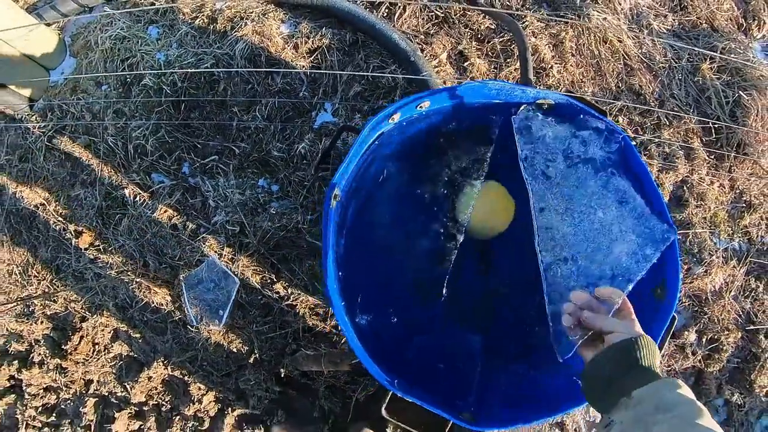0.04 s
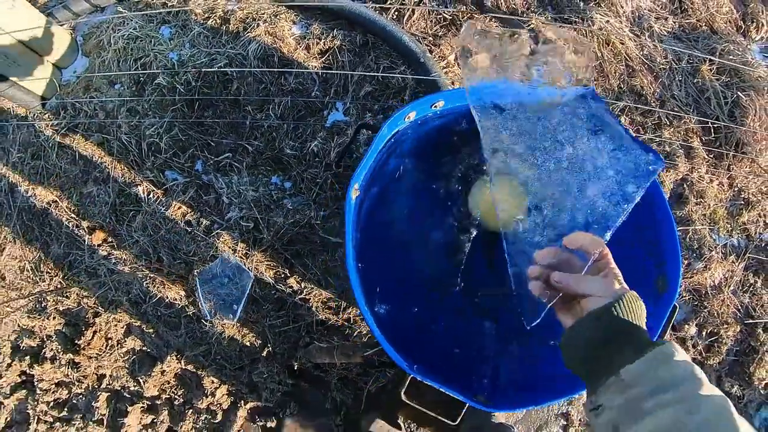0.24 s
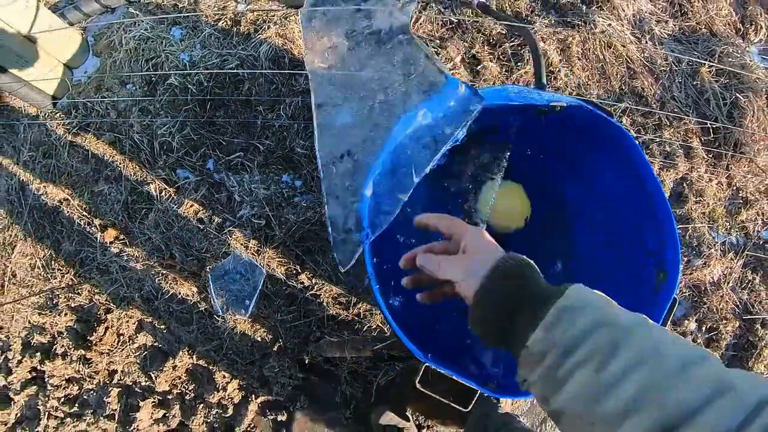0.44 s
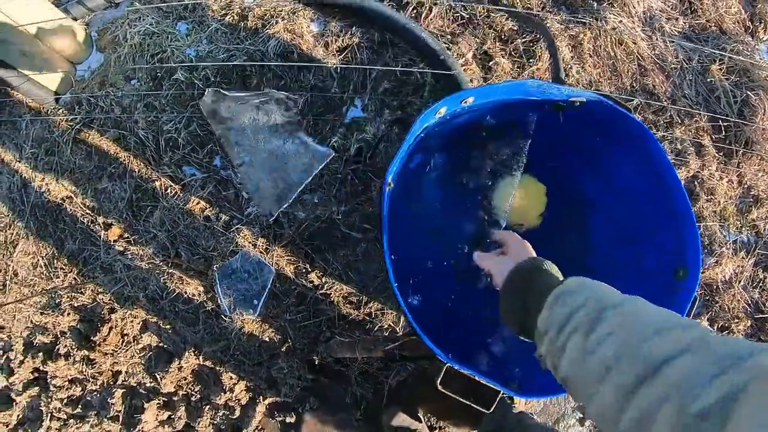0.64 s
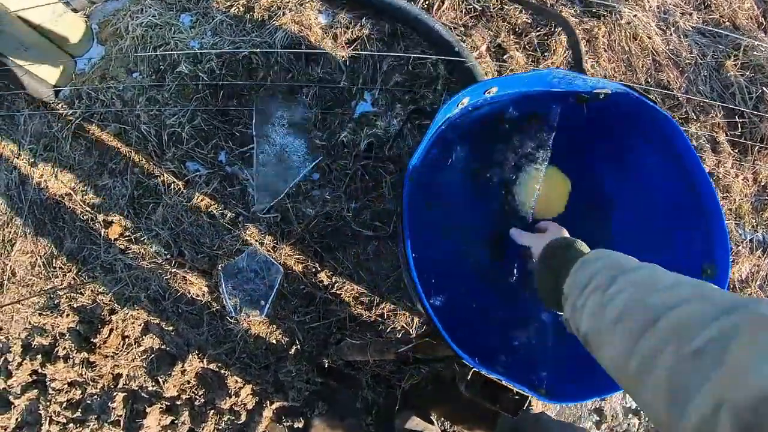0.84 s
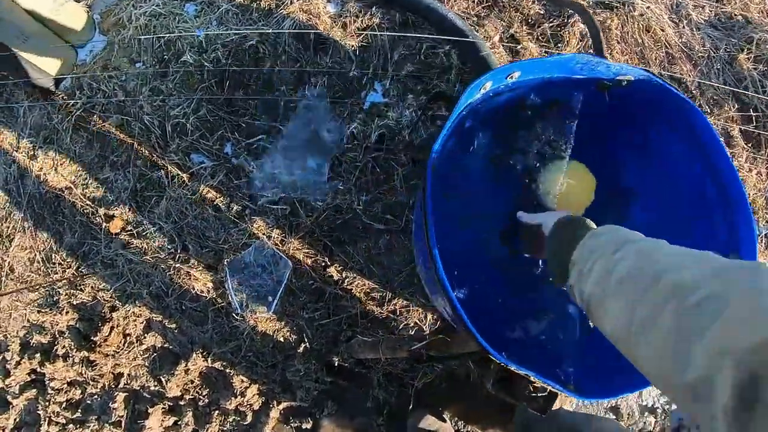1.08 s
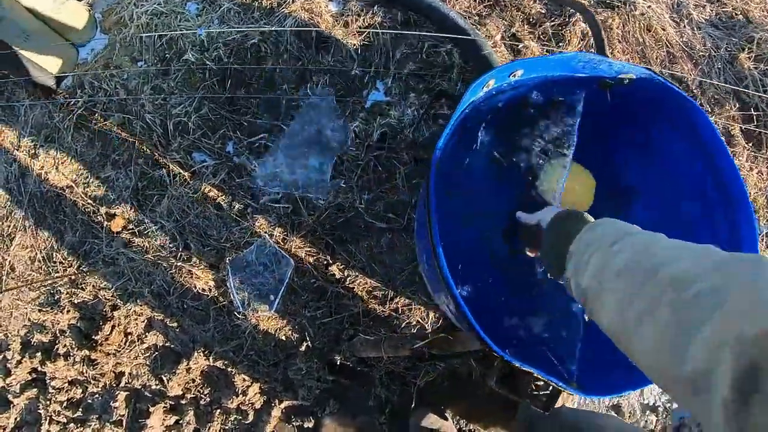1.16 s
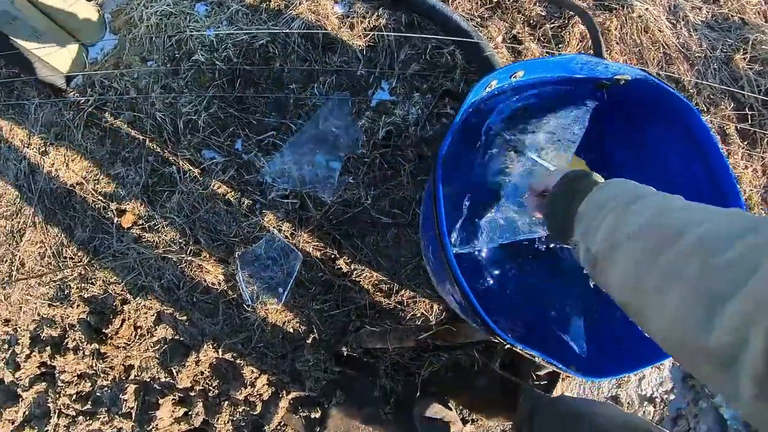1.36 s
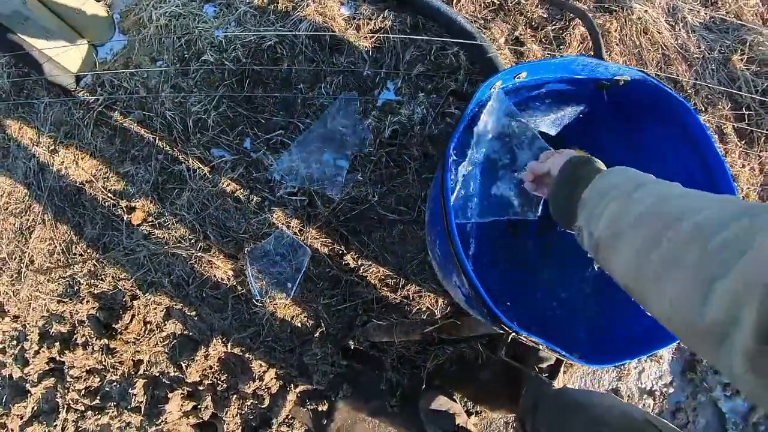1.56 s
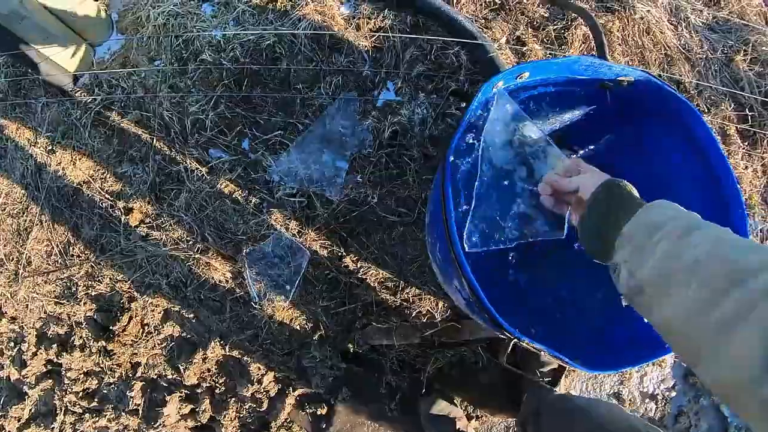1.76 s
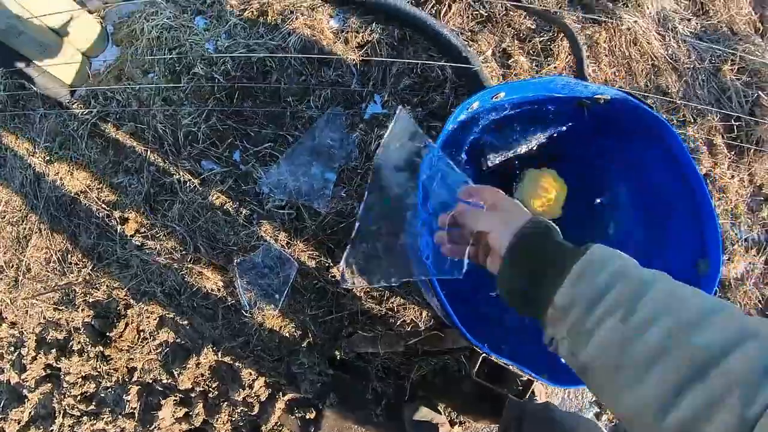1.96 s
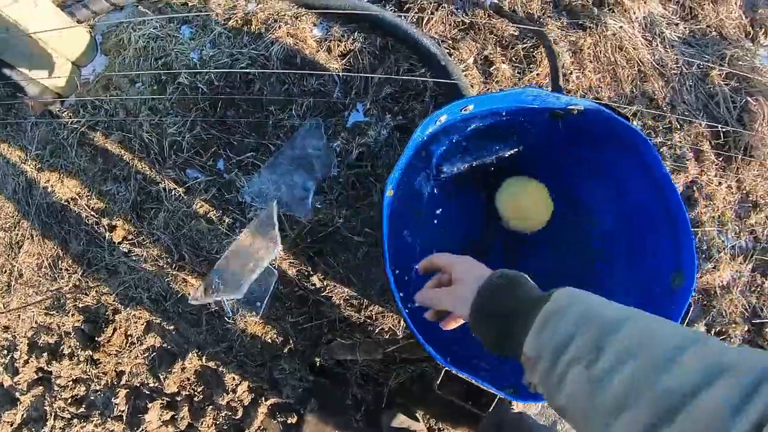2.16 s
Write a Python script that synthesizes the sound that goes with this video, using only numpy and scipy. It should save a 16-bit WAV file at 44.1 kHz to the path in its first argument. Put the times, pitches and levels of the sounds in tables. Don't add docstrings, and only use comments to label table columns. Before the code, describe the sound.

Thin sheet ice cracking and snapping by hand in a plastic tub, with small water slops

```python
import sys
import numpy as np
from scipy import signal
from scipy.fft import rfft, irfft, next_fast_len
from scipy.io import wavfile
from scipy.ndimage import uniform_filter1d

SR = 44100
rng = np.random.default_rng(int(sys.argv[2]) if len(sys.argv) > 2 else 0)


def invert_db(x):
    u = np.asarray(x, float) / 20
    return 10 ** u


def int16_out(signal):
    q = np.round(np.clip(np.atleast_2d(signal).T, -1, 1) * 32767)
    wavfile.write(sys.argv[1], SR, q.astype(np.int16))


N = 98122


def in_time(rows):
    return np.interp(np.arange(N) / SR, *np.transpose(rows))


def rms_one(x):
    return x / np.sqrt(np.mean(x ** 2) + 1e-20)


def peak_one(x):
    return x / np.abs(x).max()


def low_pass(x, hz, order=4):
    return signal.sosfilt(signal.butter(order, hz, fs=SR, output="sos"), x)


def high_pass(x, hz, order=4):
    return signal.sosfilt(signal.butter(order, hz, "high", fs=SR, output="sos"), x)


def colour(x, points):
    size = next_fast_len(2 * len(x) + 4096)
    hz, db = np.transpose(points)
    bins_hz = np.arange(size // 2 + 1) * SR / size
    log_gain = np.interp(np.log(bins_hz + 1), np.log(hz), db) * np.log(10) / 20
    cepstrum = irfft(log_gain, size)
    cepstrum[1:size // 2] *= 2
    cepstrum[size // 2 + 1:] = 0
    return irfft(rfft(x, size) * np.exp(rfft(cepstrum)), size)[:len(x)]


def resonance(x, hz, width):
    r = np.exp(-np.pi * width / SR)
    top = np.array([1, 0, -1]) * (1 - r * r) / 2
    return signal.lfilter(top, [1, -2 * r * np.cos(2 * np.pi * hz / SR), r * r], x)


def drift(rate):
    r = np.exp(-2 * np.pi * rate / SR)
    noise = rng.standard_normal(N + SR)
    return rms_one(signal.lfilter([1], [1, -2 * r, r * r], noise)[SR:])


def add(out, s, x):
    i = int(s * SR)
    out[i:i + len(x)] += x[:N - i]


def crack_growth(t, run):
    grow = invert_db(258.5 * np.minimum(t - run, 0))
    return grow * np.minimum(t / (run * run * 10), 1)


# (frequency [Hz], density [dB per Hz])
AIR_COLOUR = [(25, 12.5), (85, 5), (240, -2.5), (600, -36.5), (1000, -35.5), (7000, -23), (8500, -37.5),
              (16500, -65.5)]


def air():
    return invert_db(-64.5) * rms_one(colour(rng.standard_normal(N), AIR_COLOUR))


# (time [s], level [dB])
SLOP = [(0, -51), (.2, -70.5), (.36, -65), (.55, -69), (.87, -71.5), (.97, -58), (1.05, -61.5), (1.12, -39),
        (1.26, -53), (1.45, -35.5), (1.6, -44.5), (1.72, -38), (1.87, -40.5), (2.02, -57.5), (2.23, -70)]
# (frequency [Hz], density [dB per Hz])
SLOP_COLOUR = [(60, -38.5), (240, 4.5), (900, -13), (1800, -21), (3200, -27), (6800, -33), (8300, -66.5),
               (16000, -76.5)]


def slop():
    grains_per_s, grain_db, kinds = 900, -9, 20
    struck = rng.random(N) < grains_per_s / SR
    sizes = invert_db(5.5 * np.minimum(rng.exponential(1, N), 2)) * struck + 1e-18
    dealt = rng.integers(0, kinds, N)
    grains = np.zeros(N)
    for k, hz in enumerate(np.geomspace(500, 7000, kinds)):
        grains += resonance(sizes * (dealt == k), hz, hz / 20)
    wash = rms_one(rng.standard_normal(N) * invert_db(2 * drift(21)))
    mix = wash + invert_db(grain_db) * rms_one(grains)
    return invert_db(in_time(SLOP)) * rms_one(colour(mix, SLOP_COLOUR))


# (time [s], peak level [dB], plate ring [Hz], crack run [s], tub thump level [dB])
FIRST = [(.0005, -28.5, 2300, 0.0038, -53), (.010, -31, 2240, 0.0085, -65), (.018, -27, 3530, 0.0099, -74),
         (.048, -38.5, 2460, 0.0022, -46.5), (.6685, -42.5, 3230, 0.0079, -71),
         (.6885, -9.5, 2930, 0.00028, -25.5), (.704, -23, 3500, 0.018, -78),
         (.720, -15.5, 3780, 0.019, -28), (.7345, -12, 3530, 0.0026, -51),
         (.7498, -12.5, 4630, 0.0026, -30.5), (.883, -38, 3440, 0.019, -53),
         (.899, -29.5, 4095, 0.024, -43), (.9178, -6, 3210, 0.013, -61.5), (.9275, -7, 4276, 0.0044, -15),
         (.966, -51.5, 3400, 0.0042, -36), (1.059, -44.5, 2940, 0.0066, -76),
         (1.075, -15.5, 3800, 0.012, -27), (1.0835, -14.5, 2480, 0.003, -23.5),
         (1.107, -24, 2660, 0.0017, -28.5), (1.1375, -21, 2596, 0.0053, -33.5),
         (1.268, -37, 4500, 0.016, -69), (1.2885, -10.5, 4240, 0.0066, -24.5),
         (1.297, -21, 3010, 0.011, -21)]
SECOND = [(1.363, -22.5, 5530, 0.029, -45), (1.3824, -22.5, 4900, 0.0076, -61),
          (1.3991, -1.5, 5230, 0.0024, -16), (1.416, -24.5, 5700, 0.023, -30.5),
          (1.4575, -16, 6560, 0.0062, -21), (1.469, -29.5, 2880, .025, -20.5),
          (1.5052, -17, 5770, 0.0022, -31), (1.5312, -24, 4040, 0.0034, -55),
          (1.558, -19.5, 3190, 0.0016, -22), (1.567, -25, 2300, 0.0065, -61),
          (1.585, -23.5, 5430, 0.0013, -44), (1.628, -25, 3460, 0.0034, -70),
          (1.633, -22, 2500, 0.0054, -28), (1.648, -23, 4730, 0.006, -52),
          (1.663, -27.5, 2740, 0.0088, -26), (1.683, -24, 2230, 0.017, -23),
          (1.708, -6, 2490, 0.00028, -13), (1.717, -12, 5100, 0.0018, -54),
          (1.735, -35, 3080, 0.012, -26.5), (1.7940, -15.5, 5350, 0.0011, -16.5),
          (1.731, -28.5, 4800, 0.0065, -57)]
# (frequency [Hz], gain [dB])
FRACTURE_COLOUR = [(130, -45), (400, -12.5), (1160, -5.5), (2200, -3.5), (3300, -7.5), (6800, -9.5), (8300, -23.5),
                   (12000, -35.5), (16500, -58)]
ICE_HZ = np.array([818.0, 1148.0, 1600, 2920, 3470, 4240, 4903, 5650])


def fractures():
    ring_width, mode_width = .38, .035
    broad_db, mode_db = 2.5, -6
    crack_t60, tail_t60, snap_t60 = .017, .1, .0027
    tail_db, snap_db = -17.5, 12.5
    out, t = np.zeros(N), np.arange(SR // 5) / SR
    for s, db, hz, run, _ in [*FIRST, *SECOND]:
        white, size = rng.standard_normal((2, len(t)))
        grit = white * invert_db(18 * np.abs(uniform_filter1d(size, size=25)))
        after = np.maximum(t - run, 0)
        stray = 1 + 60 * uniform_filter1d(1. * (size > 2.7), size=31)
        tail = stray * invert_db(tail_db - 60 * after / tail_t60)
        decay = invert_db(-60 * after / crack_t60) + tail
        snap = invert_db(snap_db - 60 * t / snap_t60 - 680 * run)
        push = grit * (crack_growth(t, run) * decay + snap)

        ring = resonance(push, hz, hz * ring_width)
        ring = resonance(ring, hz, 2 * hz * ring_width)
        shared = np.zeros(len(t))
        for mode_hz, (gain, shift) in zip(ICE_HZ, rng.standard_normal((len(ICE_HZ), 2))):
            shared += invert_db(2 * gain) * resonance(push, mode_hz * invert_db(shift / 10), mode_width * mode_hz)
        piece = resonance(push, hz, mode_width * hz) + shared / 2
        broad = signal.lfilter([1], [1, -np.exp(-2 * np.pi * 0.89 * hz / SR)], push)
        burst = peak_one(ring) + invert_db(broad_db) * peak_one(broad) + invert_db(mode_db) * peak_one(piece)
        add(out, s, invert_db(db) * burst)
    return colour(out, FRACTURE_COLOUR) * invert_db(2.5)


# (frequency [Hz], width [Hz], level [dB])
TUB = [(180, 49, 5.5), (229.3, 73, -5.5), (284.7, 30, 3.5), (324, 52, 1.5), (465.4, 160, -2.5),
       (586, 100, -5), (760, 50, -17.5), (1108, 44, 0.5)]


def tub_thumps():
    out, t = np.zeros(N), np.arange(SR // 5) / SR
    for s, _, _, run, thump_db in [*FIRST, *SECOND]:
        decay = invert_db(-60 * np.maximum(t - run, 0) / .052)
        shove = high_pass(rng.standard_normal(len(t)), 170) * crack_growth(t, run) * decay
        modes = [invert_db(db) * resonance(shove, hz, width) / np.sqrt(width) for hz, width, db in TUB]
        add(out, s, invert_db(thump_db) * peak_one(sum(modes)))
    return low_pass(out, 1600)


# (time [s], peak level [dB], frequency [Hz])
PINGS = [(0.0005, -41, 2300), (0.0005, -46, 3410), (0.017, -35.5, 750), (0.015, -37, 1570),
         (0.017, -53, 3350.0), (0.049, -47.5, 1640), (0.049, -53, 970), (0.0745, -52, 1740),
         (0.083, -59, 715), (0.6685, -54, 3050), (0.6883, -15, 3086), (0.6884, -19, 1730),
         (0.688, -32, 3700), (0.709, -16.5, 3710), (0.7345, -20, 3850), (0.7345, -21.5, 5130),
         (0.751, -36, 4050), (0.751, -36, 1180), (0.75, -27, 4920), (0.882, -41.5, 3380),
         (0.9277, -5, 4545), (0.9303, -12.5, 1143), (0.9285, -15.5, 3260), (0.96, -59, 800),
         (1.0852, -21.5, 2340), (1.0835, -30, 850), (1.107, -38, 2750), (1.1355, -30, 1174),
         (1.2885, -40, 4200), (1.2872, -20, 5650.0), (1.458, -28.5, 1186), (1.505, -24, 5700),
         (1.587, -32.5, 1220), (1.609, -55, 1110), (1.609, -42, 3380), (1.633, -41, 2830),
         (1.648, -20, 846), (1.649, -28, 3650.0), (1.649, -29.5, 2020), (1.689, -26.5, 760.0),
         (1.689, -45, 2300), (1.7077, -14.5, 3860), (1.7085, -18.5, 891), (1.716, -16.5, 3726),
         (1.719, -21, 952), (1.717, -25, 2536), (1.7965, -24.5, 1520), (1.7957, -20.5, 5830),
         (1.7945, -50, 4470), (1.9535, -29.5, 706), (1.9544, -35.5, 3094)]


def pings():
    out, t = np.zeros(N), np.arange(SR // 10) / SR
    for s, db, hz in PINGS:
        t60 = .036 * (1000 / hz) ** 0.25
        tone = np.sin(2 * np.pi * (hz * t + rng.random()))
        rise = np.minimum(t / .001, 1)
        add(out, s, invert_db(db - 60 * t / t60) * rise * tone)
    return out * (1 + .3 * drift(200))


# (time [s], peak level [dB], frequency [Hz], t60 [s])
TICKS = [(.083, -57, 3380, .04), (0.239, -50, 4860, 0.0095), (.271, -50, 5840, 0.027),
         (.305, -48, 4480, 0.06), (.347, -55, 1850, .08), (0.35, -49, 5390, 0.1), (0.382, -49, 5350, 0.05),
         (0.583, -55, 3780, 0.15), (0.589, -59.5, 1590, 0.2), (0.591, -57, 5700, 0.09),
         (.756, -37.5, 1150, 0.094), (1.18, -42, 4700, .03), (1.77, -42, 6200, .02),
         (1.865, -41, 2800, 0.029), (1.866, -48, 6400, .02), (1.897, -49, 5800, .02),
         (1.918, -53, 6550, .06), (1.9533, -31, 2900, .012), (1.962, -45, 2600, 0.022),
         (1.996, -53, 3450, .02), (2.041, -56.5, 3400, .05), (2.144, -56.5, 4850, .04)]


def ticks():
    out, t = np.zeros(N), np.arange(SR // 8) / SR
    for s, db, hz, t60 in TICKS:
        white = low_pass(rng.standard_normal(len(t)), 1.3 * hz)
        scratch = white * invert_db(-60 * t / t60)
        ring = np.zeros(len(t))
        for ratio, share in [(1, 1), (1.13, .6), (.88, .5)]:
            ring += share * resonance(scratch, hz * ratio, 50 + 4 / t60)
        click = white * invert_db(-60 * t / 0.003)
        click = resonance(resonance(click, hz, hz), hz, hz)
        add(out, s, invert_db(db) * (peak_one(ring) + 0.067 * peak_one(click)))
    return low_pass(out, 7100, 8)


# (time [s], peak level [dB], frequency [Hz], t60 [s], rise [octaves per s])
DRIPS = [
    (0.124, -47, 1500, 0.047, .5),
    (0.3122, -38.5, 1252, 0.063, 2),
    (0.344, -43.5, 1346, 0.076, 1.4),
    (.383, -51, 1434, 0.082, 0.78),
    (1.976, -52, 1033, 0.54, 29),
    (2.056, -44, 1600, 0.032, 1.7),
    (2.056, -45, 770, 0.3, 27),
]


def drips():
    out, t = np.zeros(N), np.arange(SR // 6) / SR
    for s, db, hz, t60, rise in DRIPS:
        pitch = hz * 2 ** (rise * t)
        tone = np.sin(2 * np.pi * np.cumsum(np.minimum(pitch, 9000)) / SR)
        onset = np.minimum(t * hz / 2, 1)
        burst = np.clip((2.2 - pitch / hz) * 2, 0, 1)
        add(out, s, invert_db(db - 60 * t / t60) * tone * onset * burst)
    return out * (1 + .4 * drift(120))


# (time [s], peak level [dB], frequency [Hz], t60 [s])
THUDS = [
    (0.9291, -5, 188, 0.038),
    (1.401, -13.5, 228.5, 0.11),
    (1.7122, -25.5, 271, 0.11),
    (1.795, -31, 233, 0.35),
]


def thuds():
    out, t = np.zeros(N), np.arange(SR // 5) / SR
    for s, db, hz, t60 in THUDS:
        add(out, s, invert_db(db - 60 * t / t60) * np.sin(2 * np.pi * hz * t) * np.minimum(t * hz, 1))
    return low_pass(out, 1600)


# (time [s], level [dB])
CREAK = [(.93, -81.5), (.95, -63), (1.0, -46.5), (1.05, -62), (1.1, -40), (1.18, -57.5), (1.28, -53),
         (1.34, -53.5), (1.7, -50), (1.88, -59), (1.97, -83.5)]
# (frequency [Hz], level [dB])
CREAK_RINGS = [(830, -2.5), (1160, -3.5), (1860, -3.5), (2370, -4), (3170, -0.5), (3400, -1), (4750, -1),
               (5400, -5.5), (6600, -16.5)]


def creak():
    slips = rng.standard_normal(N) * invert_db(5 * drift(90))
    rings = np.zeros(N)
    for hz, db in CREAK_RINGS:
        rings += invert_db(db + 3 * drift(15)) * rms_one(resonance(slips, hz, hz / 75))
    return rms_one(low_pass(rings, 7300, 8)) * invert_db(in_time(CREAK))


# (time [s], level [dB])
RUB = [
    (2.085, -86.5),
    (2.12, -52),
    (2.16, -44.5),
    (2.23, -50),
]
# (frequency [Hz], width [Hz], level [dB])
RUB_RINGS = [(258, 38, 0.5), (814, 99, -6.5), (1510, 190, -13), (2110, 46, -19), (2225, 410, -15.5),
             (2927, 45, -6)]


def rub():
    noise = rng.standard_normal(N) * invert_db(1.44 * drift(59.6))
    rings = np.zeros(N)
    for k, (hz, width, db) in enumerate(RUB_RINGS):
        rings += invert_db(db) * resonance(noise, hz, width) * (-1) ** k
    dull = low_pass(rings + invert_db(-37.5) * noise, 3200, 10)
    sound = rms_one(dull + invert_db(-28.5) * resonance(noise, 5230, 262))
    return sound * invert_db(in_time(RUB)) * (np.arange(N) > RUB[0][0] * SR)


def scene():
    background = air()
    mid = slop() + fractures() + tub_thumps() + pings() + ticks() + drips() + thuds() + creak() + rub()
    side = signal.lfilter([1, -.6], [1], high_pass(mid, 2800, 6))
    side = side * invert_db(-12) * np.tanh(2 * drift(150))
    return np.array([mid + side, mid - side]) + background


def top_cut(x):
    return signal.sosfilt(signal.butter(12, 16400, fs=SR, output="sos"), x)


def record(dry):
    thin = high_pass(dry, 75)
    return top_cut(np.clip(thin, -1, 1))


dry = scene()
out = record(dry)
int16_out(out)
```